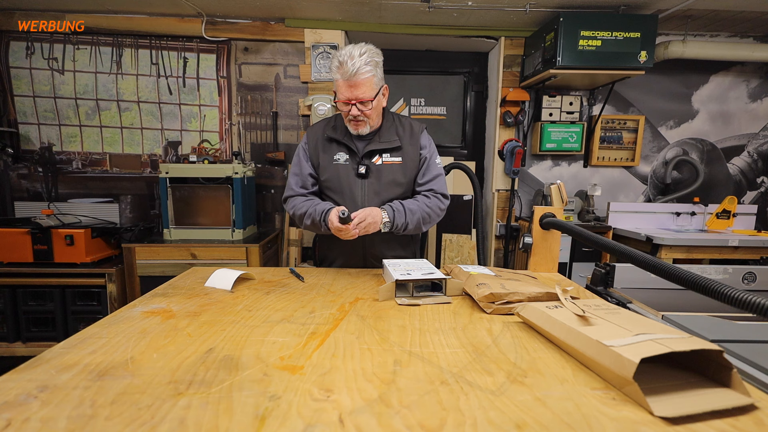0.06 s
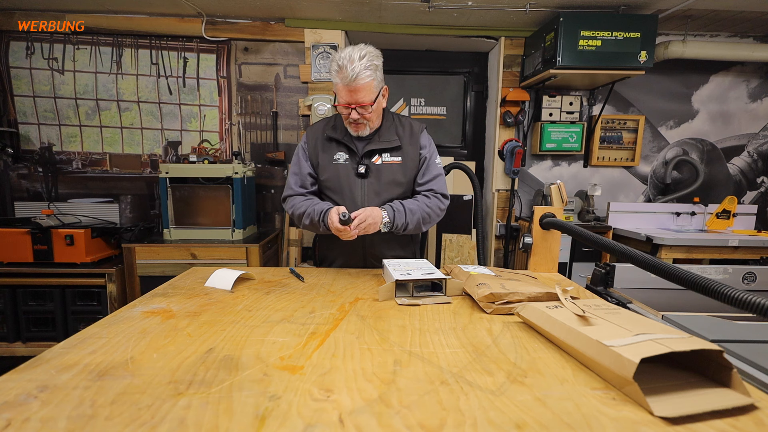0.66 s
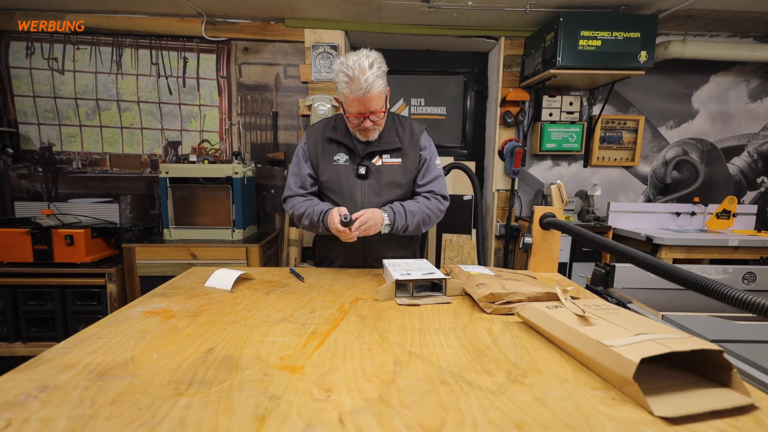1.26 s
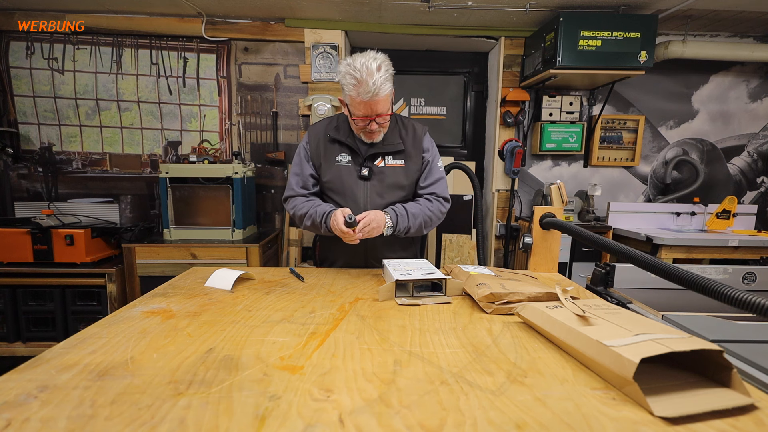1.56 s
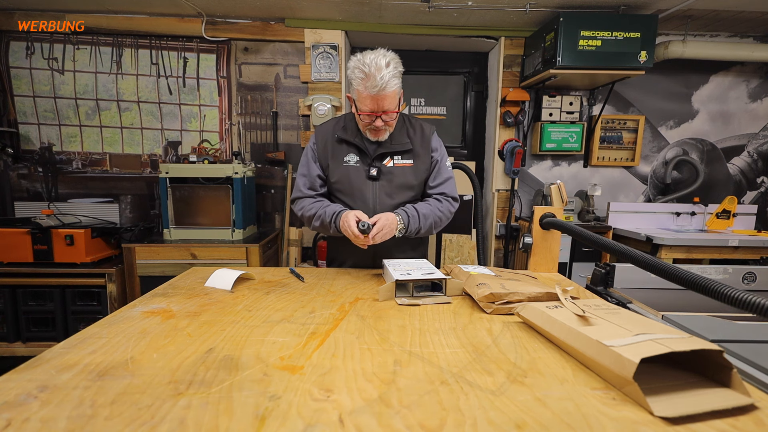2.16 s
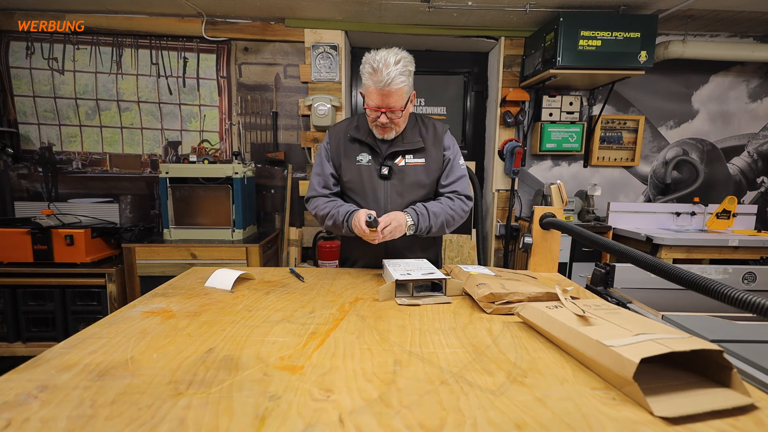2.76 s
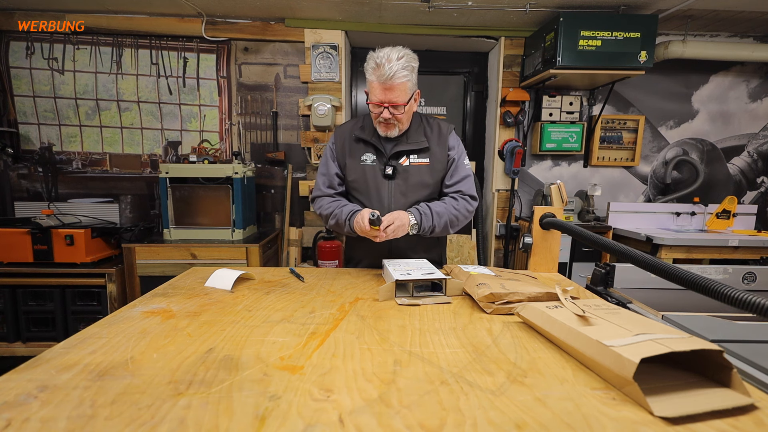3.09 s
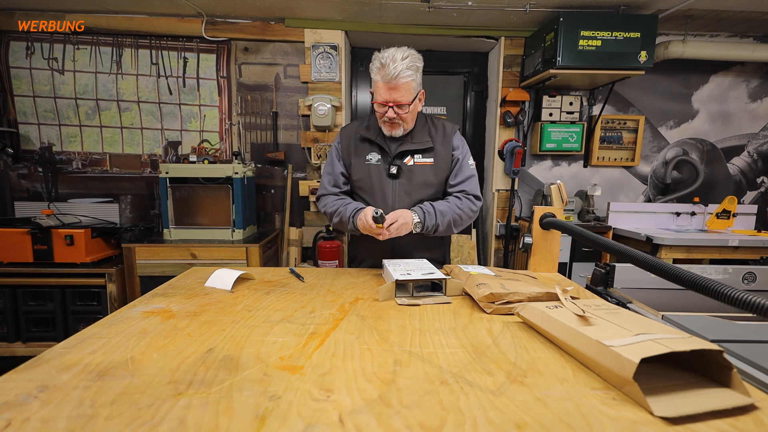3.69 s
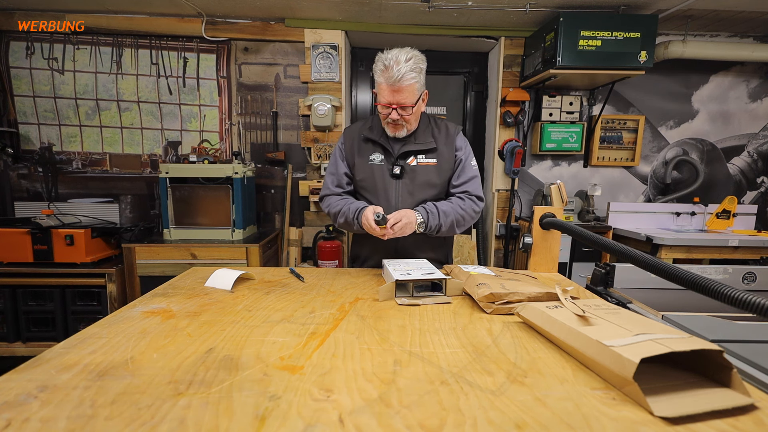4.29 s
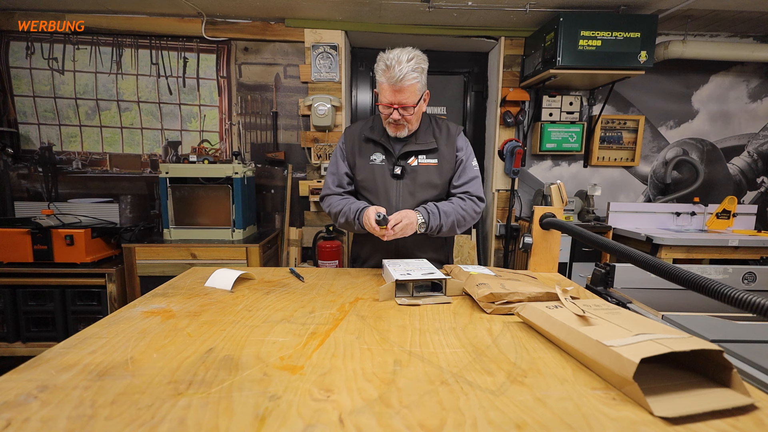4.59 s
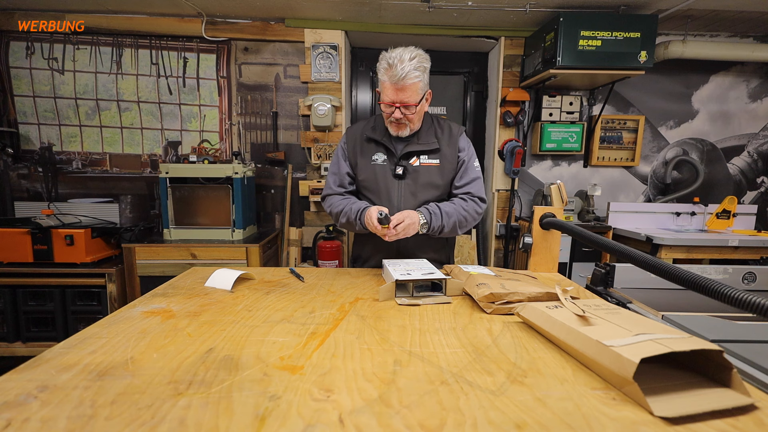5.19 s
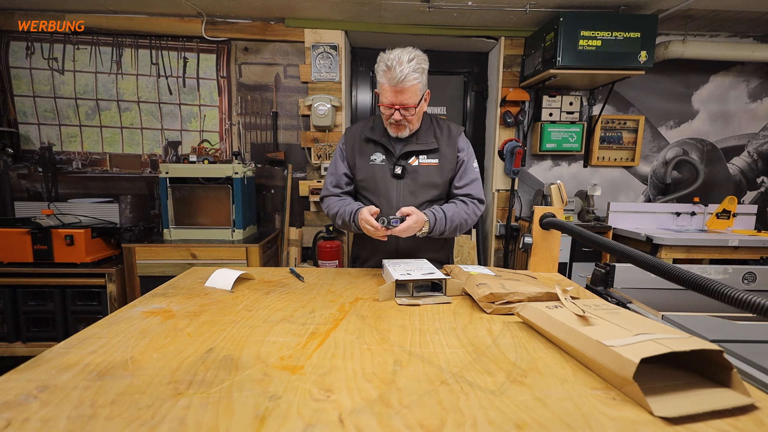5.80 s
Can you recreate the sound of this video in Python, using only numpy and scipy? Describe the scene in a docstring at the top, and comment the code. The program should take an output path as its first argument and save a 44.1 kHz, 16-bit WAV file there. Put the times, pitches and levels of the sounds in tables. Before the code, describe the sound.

A small handheld rotary tool runs free with a high, fizzing electric whine. Three sharp button clicks step it down to a quieter, rattling idle, while clothes rustle with a faint squeal. Another click brings the whine back at medium speed, the next drops it to idle, and a last one switches it off. A soft rustle and a finger scrape follow, all close to a clip-on microphone in a workshop.

```python
"""A small rotary tool runs free in a man's hands, close to a clip-on microphone in a workshop.
It opens at top speed: the three-pole motor whines, its brushes fizz and its fan rushes.
Three clipping button clicks step it down, the shaft coasting until the drive catches it each time.
At idle, brush ticks rattle the housing while clothes rustle with a faint squeal. More clicks speed it up,
drop it to idle and switch it off; a last rustle and a finger scrape end the scene."""
import sys
import numpy as np
from scipy import signal
from scipy.fft import rfft, irfft, next_fast_len
from scipy.io import wavfile
from scipy.ndimage import uniform_filter1d, minimum_filter1d, map_coordinates

SR = 44100
rng = np.random.default_rng(int(sys.argv[2]) if len(sys.argv) > 2 else 0)


def to_wav(sig):
    """Store sig (one row per channel, or 1-D mono) as 16-bit WAV at the path in sys.argv[1].

    Samples outside -1..1 are clipped; the rate is SR.
    """
    pcm = np.clip(np.atleast_2d(sig), -1, 1) * 32767
    pcm = np.round(pcm).astype(np.int16)
    wavfile.write(sys.argv[1], SR, pcm.T)  # frames by channels


N = 257974
T = np.arange(N) / SR

# The whine's voicing at each speed, in playing order: (shaft order, relative level [dB])
TOP_ORDERS = [(1, -41.5), (3, -22), (5, -43), (6, -49), (7, -36), (9, -40), (11, -28.5), (12, -19.5),
              (13, -37), (14, -34.5), (15, -32), (17, -39), (21, -39), (24, -45), (25, -40.5), (26, -39),
              (27, -40), (28, -39), (29, -43), (30, -41), (39, -41.5), (40, -42), (41, -45)]
HIGH_ORDERS = [(3, -23), (6, -31), (7, -39), (9, -24), (11, -40.5), (12, -47), (13, -33), (14, -36.5),
               (15, -22), (16, -56), (18, -35), (20, -37.5), (21, -36.5), (22, -55), (24, -33.5), (27, -56),
               (33, -39), (34, -49), (35, -47.5), (36, -43), (39, -45.5), (43, -49), (45, -46), (50, -69)]
MID_ORDERS = [(3, -49.5), (9, -27), (11, -43), (13, -38.5), (15, -42), (18, -43), (19, -47.0), (20, -44),
              (21, -30), (22, -54), (23, -40), (24, -33), (25, -47.5), (27, -34.5), (29, -44.5), (30, -41),
              (32, -54), (33, -57), (34, -54), (36, -48), (42, -48), (45, -45.5), (46, -46.8), (57, -52),
              (66, -50)]
MID_SETTLED_ORDERS = [(3, -39.5), (9, -25), (11, -50), (12, -45), (13, -36.5), (15, -31), (18, -36),
                      (19, -36), (20, -43), (21, -24.5), (22, -38), (23, -37.5), (24, -26.5), (25, -48),
                      (27, -38), (29, -44), (30, -37), (31, -44.5), (32, -50), (39, -57), (41, -38),
                      (42, -38), (43, -55), (44, -48), (45, -47), (46, -43), (54, -51), (57, -45),
                      (66, -44), (78, -45)]
REVVED_ORDERS = [(9, -29), (10, -37.5), (12, -39.5), (14, -40.5), (15, -36.5), (17, -42), (18, -40.5),
                 (20, -44), (21, -29.5), (23, -37), (24, -34), (26, -40), (27, -30), (28, -33), (30, -35.5),
                 (31, -39.5), (33, -42), (36, -40.5), (38, -45), (39, -33.5), (40, -40), (41, -54),
                 (42, -37), (43, -40), (45, -39.5), (46, -37), (60, -56), (63, -43), (66, -55), (72, -52),
                 (81, -62), (84, -52), (87, -56)]
REVVED_SETTLED_ORDERS = [(9, -29), (10, -31), (11, -34.5), (12, -48), (14, -40.5), (15, -31.5), (17, -31.5),
                         (18, -31.5), (20, -39.5), (21, -30.5), (24, -35), (26, -45), (27, -21.5),
                         (28, -40), (29, -38), (30, -30), (31, -33.5), (36, -34), (37, -35), (38, -31),
                         (39, -31.5), (40, -32), (42, -34), (43, -37), (45, -48), (50, -40), (51, -44),
                         (60, -38), (63, -54), (66, -49), (72, -40), (75, -56), (81, -52), (87, -50)]
# Tone colour of the brush bed and of its buzzy edge: (frequency [Hz], gain [dB])
BRUSH_EQ = [(700, -20.5), (1400, 10.5), (2500, -4.5), (4200, 2), (6500, -4), (7800, -2), (8600, -9),
            (9500, -3.5), (11000, -4), (13000, -9.5), (16000, -17)]
BUZZ_EQ = [(1500, -4.5), (2400, -4), (3200, 2), (4300, 1.5), (5100, -9), (6000, -3), (7200, -10),
           (8400, -19), (9400, -9.5), (12500, -15.5), (15000, -28.5)]

def whine(turns, speed, fast):
    """At speed the shaft's harmonics sing over a bed of fused brush ticks."""
    whine_db, fizz_db, _, buzz_db = spell_levels()
    # (orders, entry [s], crossfade [s], trim [dB])
    voicings = [(TOP_ORDERS, -1, .01, -.7), (HIGH_ORDERS, .47, .04, -.3),
                (MID_ORDERS, .88, .06, -.4), (MID_SETTLED_ORDERS, 1.22, .08, -.3),
                (REVVED_ORDERS, 3, .01, -.8), (REVVED_SETTLED_ORDERS, 4.11, .12, -.7)]
    harmonics = np.zeros(N)
    for orders, entry, fade, db in voicings:
        blend = fade_in(entry, fade)
        voice = amp(db) * tones(turns, orders, waver_db=1.23)
        harmonics = np.sqrt(1 - blend) * harmonics + np.sqrt(blend) * voice
    bed_ticks = brush_ticks(turns, [0, -3, -6], chatter=2.22, chatter_t60=.0093, scatter_db=0)
    brushes = coloured(bed_ticks, BRUSH_EQ)
    bed = amp(whine_db - 12.5) * band(brushes, 720, 11100)
    fizz = amp(fizz_db - 1.5) * band(brushes, 7740, 17700)
    buzz_ticks = brush_ticks(turns, [0, -5, -8], chatter=.77, chatter_t60=.0093, scatter_db=1.1)
    buzz = amp(whine_db + buzz_db) * band(coloured(buzz_ticks, BUZZ_EQ), 1520, 13500)
    sparking = speed / 200  # a faster shaft makes the brushes spark more
    grit = amp(fizz_db - 12) * sparking * band(noise(BRUSH_EQ), 6900, 16800)
    return fast * (amp(whine_db) * harmonics + bed + fizz + buzz + grit)


# The mix for each fast spell: (start [s], whine level [dB], opening dip [dB], recovery [s],
# fizz level [dB], fan level [dB], buzz relative to the whine [dB])
FAST_SPELLS = [(0, -18, -2, 0.52, -33.5, -26, -24), (.46, -17, 5, .36, -40.5, -33, -21),
               (.85, -19.5, 7, 0.48, -40.5, -38, -12.5), (3.68, -19, 4, 0.75, -34, -32, -10)]

def spell_levels():
    """Faders in dB for whine, fizz, fan and buzz: the whine jumps, then settles; the others glide."""
    glide_s, fizz_dip_share = .095, .68
    whine_db = np.full(N, FAST_SPELLS[0][1])
    others = np.array(FAST_SPELLS[0][4:])[:, None]
    for start, db, dip_db, recovery, *levels in FAST_SPELLS:
        dip = dip_db * np.clip(1 - (T - start) / recovery, 0, 1)
        whine_db = np.where(T >= start, db - dip, whine_db)
        target = np.array(levels)[:, None] - np.outer([fizz_dip_share, 0, 0], dip)
        others = others + np.clip((T - start) / glide_s, 0, 1) * (target - others)
    return whine_db, *others


# The idle hum, then the housing's song in each idle: (shaft order, relative level [dB])
HUM_ORDERS = [(6, -53), (9, -52.5), (15, -44), (17, -48), (18, -48.5), (20, -50.5), (21, -46.5), (22, -54)]
FIRST_IDLE_ORDERS = [(42, -33.5), (45, -37), (48, -43), (51, -46), (54, -42), (57, -35), (60, -40.5),
                     (61, -37), (63, -39), (64, -40.5), (66, -36.5), (78, -36.5), (79, -42), (81, -34.5),
                     (82, -34), (84, -45), (87, -42)]
SECOND_IDLE_ORDERS = [(45, -33), (46, -58), (48, -39), (51, -61), (57, -39), (60, -36), (61, -37.5),
                      (63, -65), (64, -37.5), (67, -37), (68, -50), (81, -49), (83, -39), (84, -37),
                      (85, -37.5), (87, -45)]
# The housing's resonances and the fizz on top: (frequency [Hz], gain [dB])
HOUSING_EQ = [(410, -74), (700, -20), (995, -17.5), (1120, -8), (1570, -14), (1790, -16.5), (2250, -15.5),
              (2650, -15.5), (3060, 3), (3760, -8.5), (4290, -3.5), (5150, -8), (6100, -4.5), (8230, -25),
              (9500, -24.5), (15800, -40)]
IDLE_FIZZ_EQ = [(7000, -5.5), (8000, -5), (8600, -8), (9500, 5), (10400, -7.5), (12300, -9.5),
                (13300, -5.5), (14300, -16), (16000, -15)]
# Fader rides on two treble bands, one list per idle: (time [s], ring level [dB], rattle level [dB])
IDLE_RIDES = [
    [(1.58, -29, -37), (1.67, -36.5, -37), (1.77, -35, -37), (1.95, -31, -29), (2.07, -39.5, -33.5),
     (2.62, -39, -31), (2.86, -29, -29), (3.19, -36, -30.5), (3.31, -32, -27.5), (3.64, -35.5, -29.5)],
    [(4.63, -27.5, -26.5), (4.648, -24.5, -27), (4.69, -33, -28), (4.718, -32, -27), (4.78, -33, -30),
     (5.086, -32, -29), (5.122, -29.5, -29), (5.24, -29.5, -29.5)],
]

def rattle(turns, speed, fast):
    """At low speed single ticks ring the housing; while the motor coasts the brushes only slide."""
    idle_hz, hum_db_per_octave = 71, 13
    off_drop_db, off_fade_db_per_s, stop_s = 10, 55, 5.395
    rev_s, off_s = BUTTON_CLICKS[3][0], BUTTON_CLICKS[-1][0]
    ring_db, rattle_db = curves(np.vstack(IDLE_RIDES))
    braking = np.maximum(0, -uniform_filter1d(np.gradient(np.log(speed)) * SR, size=1000))
    powered = 1 - fade_in(off_s, .005)
    drive = np.clip(.86 * powered / (1 + (braking / 5) ** 2), 0, 1)
    contacts = brush_ticks(turns, [0, -3, -5], chatter=1.7, chatter_t60=.011, scatter_db=.5)
    scratch = np.sqrt(drive) * contacts + np.sqrt(1 - drive) * rng.standard_normal(N)
    body = coloured(scratch, HOUSING_EQ)
    hum_db = -41 + hum_db_per_octave * np.log2(np.maximum(speed / idle_hz, 1))
    hum = amp(hum_db - 1.5) * np.sqrt(drive) * tones(turns, HUM_ORDERS, waver_db=2.9)
    hum += amp(hum_db - 4.5) * band(body, 620, 2430)
    # the ticks repeat so evenly at idle that the orders nearest the housing's modes sing out
    first = tones(turns, FIRST_IDLE_ORDERS, waver_db=2, spread=.75)
    second = tones(turns, SECOND_IDLE_ORDERS, waver_db=2, spread=.75)
    singing = drive ** 2 * np.minimum(idle_hz / np.maximum(speed, 1), 1) ** 2
    shell = body + singing * np.where(T < rev_s, .95 * first, 1.1 * second)
    ring = amp(ring_db - .6) * band(shell, 2504, 3660)
    clatter = amp(rattle_db - 1.16) * band(shell, 3610, 8740)
    fizz = powered * amp(rattle_db - 17) * band(coloured(scratch, IDLE_FIZZ_EQ), 7660, 16500)
    run_down = amp(-(1 - powered) * (off_drop_db + off_fade_db_per_s * (T - off_s)))
    gate = (1 - fast) * (1 - fade_in(stop_s, .06))
    return gate * (np.sqrt(run_down) * hum + run_down * (ring + clatter + fizz))


def brush_ticks(turns, pole_db, chatter, chatter_t60, scatter_db):
    """Three brush contacts a turn; each pole has its own strength and slowly changing chatter."""
    out, t = np.zeros(N), np.arange(SR // 50) / SR
    taps = np.arange(-7, 9)  # a short sinc places each tick between samples
    for pole, db in enumerate(pole_db):
        contact_turns = np.arange(1, int(turns[-1])) + pole / len(pole_db)
        at = np.interp(contact_turns, turns, np.arange(N))
        strength = amp(db + scatter_db * rng.standard_normal(len(at)))
        strength *= np.sqrt(np.minimum(np.gradient(at), SR / 50))  # even power at any tick rate
        index = at.astype(int)[:, None] + taps
        pulses = strength[:, None] * np.sinc(index - at[:, None])
        train = np.bincount(index.ravel(), pulses.ravel(), N)[:N]
        drift = 2 * np.pi * rng.random() + .5 * wobble(2.443)
        for share in (np.cos(drift), np.sin(drift)):
            burst = rng.standard_normal(len(t)) * amp(-60 * t / chatter_t60)
            out += chatter * share * signal.oaconvolve(train, burst / np.linalg.norm(burst))[:N]
        out += train
    return unit(out)


# The motor's drifting pitch, one list for the opening and one per click: (time [s], speed [turns/s])
HELD_SPEEDS = [
    [(.07, 278.5), (.17, 272), (.31, 278.2), (.44, 280.1)],
    [(.6, 209.3), (.83, 209.9)],
    [(1.02, 142.8), (1.2, 144.2), (1.3, 139.5)],
    [(1.9, 70.9), (2.32, 71.5), (2.52, 72.7), (3.15, 72.9), (3.29, 75.2), (3.64, 76.8)],
    [(3.82, 149.3), (4.17, 151), (4.5, 151.6), (4.59, 148)],
    [(4.85, 69.7), (5.25, 70.4)],
    [(5.3, 0)],
]

def shaft_speed():
    """Turns per second: after a click the shaft spins up, or drag slows it until the drive catches it."""
    drag_per_s, catch_sharpness, spin_up_s = 4.7, 12, .033
    switch_lead_s = .005  # the contact switches just ahead of the snap
    speed = curves(HELD_SPEEDS[0])[0]
    for (click_s, *_), setting in zip(BUTTON_CLICKS, HELD_SPEEDS[1:]):
        held = curves(setting)[0]
        t = np.maximum(T - click_s + switch_lead_s, 0)
        before = speed[np.argmax(t > 0)]
        if held.max() > before:
            glide = held + (before - held) * np.exp(-t / spin_up_s)
        else:
            coasting = before * np.exp(-drag_per_s * t)
            glide = (held ** catch_sharpness + coasting ** catch_sharpness) ** (1 / catch_sharpness)
        speed = np.where(t > 0, glide, speed)
    return speed


# Button hits: (time [s], level [dB], ring pitch [Hz], attack [s], thud trim [dB], bright ring trim [dB])
BUTTON_CLICKS = [(0.4547, 1, 3410, 0.00077, -65, -5.5), (0.841, .5, 3220, 0.00055, -60, -0.5),
                 (1.543, 3.4, 3400, 0.0008, -38, -28), (3.6734, 5, 3760, 0.00055, -37.5, -3),
                 (4.595, 1.5, 3480, 0.00086, -53, -12), (5.2644, 4.5, 2988, 0.0012, -60, -12)]
# Tone colour of a scrape on plastic, for button and finger: (frequency [Hz], gain [dB])
SCRAPE_EQ = [(1500, -18), (3200, -6), (6500, -11), (10000, -23), (16000, -37)]

def button():
    """The button scrapes for a moment, then snaps and rings the plastic shell."""
    clicks, press = np.zeros(N), np.zeros(N)
    t = np.arange(SR // 20) / SR
    for start, db, hz, attack, thud_db, bright_db in BUTTON_CLICKS:
        push = (t / attack * np.exp(1 - t / attack)) ** 3
        ring = np.sin(2 * np.pi * hz * t) + amp(bright_db + 2.5) * np.sin(2 * np.pi * 5950 * t)
        burst = push * rng.standard_normal(len(t))
        crack = signal.lfilter([1, 0, -1], [1, -1.25, .55], burst)  # broad peak near 4 kHz
        snap = .8 * push * ring + .21 * crack
        thud = amp(thud_db + 10.5) * np.sin(2 * np.pi * 130 * t) * amp(-60 * t / .014)
        clicks[round(start * SR):][:len(t)] += amp(db + 4.5) * (snap + thud)
        press += amp(db - 25.5) * fade_in(start - .008, .003) * (1 - fade_in(start + .0028, .0018))
    return clicks + press * noise(SCRAPE_EQ)


# Tone colour of the fan's rush: (frequency [Hz], gain [dB])
FAN_EQ = [(25, -46), (80, -36), (150, -23.5), (280, -13), (360, -9), (440, -1.5), (520, -3), (650, 4.5),
          (950, -5), (1300, -0.5), (2000, -9), (3100, -9.5), (4300, -6.5), (7000, -14.5), (15000, -43)]

def fan(fast):
    """The fan rushes at speed; at idle only a low draught is left, as soft as cloth."""
    fan_db = spell_levels()[2]
    rush = fast * amp(fan_db) * noise(FAN_EQ)
    draught = (1 - fast) * (1 - fade_in(5.3, .2)) * amp(-46) * noise(CLOTH_EQ)
    return amp(1.2 * wobble(14)) * (rush + draught)


# Swells of cloth against the microphone: (middle [s], length [s], level [dB])
CLOTH_SWELLS = [(1.35, 0.81, -44), (2.35, 0.97, -33), (4.365, 0.96, -33.5), (5.85, 0.32, -40)]
# The cloth's dull tone colour: (frequency [Hz], gain [dB])
CLOTH_EQ = [(40, -33), (90, -16), (180, -5), (350, -3), (440, 1.5), (560, -4), (1000, -6.5), (1600, -7),
            (2500, -11.5), (6000, -13), (12000, -40)]

def handling():
    """Clothes rustle with each shift of the body; a finger scrapes the shell once the tool has stopped."""
    swells = sum(amp(db) * arch(middle, length) ** 1.48 for middle, length, db in CLOTH_SWELLS)
    finger = amp(-41 + 3 * wobble(200)) * arch(middle=5.785, length=.076) * noise(SCRAPE_EQ)
    return swells * amp(1.64 * wobble(40)) * noise(CLOTH_EQ) + finger


# The squeal's thin upper partials: (harmonic number, relative level [dB])
SQUEAL_PARTIALS = [(6, 2), (7, 0), (8, 2), (9, -6), (10, -8), (12, -14)]

def squeal():
    """A faint high squeal rises and falls with the longest rustle."""
    middle_s, length_s, peak_fundamental_hz, glide_hz_per_s = 2.32, .6, 1670, 1800
    hz = peak_fundamental_hz - glide_hz_per_s * np.minimum(np.abs(T - middle_s), length_s)
    cycles = np.cumsum(hz * (1 + .006 * wobble(300) + .008 * wobble(25))) / SR
    envelope = amp(-50 + 4.5 * wobble(45)) * np.sqrt(arch(middle_s, length_s))
    return envelope * tones(cycles, SQUEAL_PARTIALS, waver_db=4)


# The workshop's noise floor: (frequency [Hz], gain [dB])
ROOM_EQ = [(15, -33), (25, -15), (43, -8), (96, -10), (133, -2.5), (179, -3), (403, -6.5), (557, -9.5),
           (710, -4.5), (929, -13), (1250, -11), (12700, -17), (15800, -20)]

def workshop(x, t60):
    """The cluttered room answers x briefly, over a steady room tone."""
    t = np.arange(SR // 3) / SR
    tail = rng.standard_normal(len(t)) * amp(-60 * t / t60) * (t > .004)
    echo = signal.fftconvolve(x, tail / np.linalg.norm(tail))[:N]
    return amp(-21) * echo + amp(-51.5) * noise(ROOM_EQ)


def tones(turns, orders, waver_db, spread=1):
    """Harmonics of a rotation, each wavering alone, at rms 1; a small phase spread bunches them."""
    knots = np.arange(0, N / SR + 1, .1)
    out = np.zeros(N)
    for order, db in orders:
        waver = np.interp(T, knots, amp(waver_db * rng.standard_normal(len(knots))))
        out += amp(db) * waver * np.sin(2 * np.pi * (order * turns + spread * rng.random()))
    return unit(out)


def coloured(x, eq):
    """x through a minimum-phase filter shaped like the EQ curve, at rms 1."""
    size = 2 * next_fast_len(N // 2 + SR // 4)
    hz, db = np.transpose(eq)
    gain = amp(np.interp(np.log(np.fft.rfftfreq(size, 1 / SR) + 1), np.log(hz), db))
    cepstrum = irfft(np.log(gain + 1e-6))[:size // 2]
    cepstrum[1:] *= 2
    return unit(irfft(rfft(x, size) * np.exp(rfft(cepstrum, size)))[:N])


def noise(eq):
    """Noise shaped by an EQ curve, at rms 1."""
    return coloured(rng.standard_normal(N), eq)


def band(x, lo_hz, hi_hz):
    """One band of x, at rms 1."""
    return unit(signal.sosfilt(signal.butter(4, [lo_hz, hi_hz], "band", fs=SR, output="sos"), x))


def curves(rows):
    """One automation curve for each column after the time."""
    times, *columns = np.transpose(rows)
    return [np.interp(T, times, column) for column in columns]


def wobble(rate):
    """A smooth random curve, rate knots a second."""
    return map_coordinates(rng.standard_normal(int(N * rate / SR) + 4), [T * rate])


def fade_in(middle, length):
    """A straight ramp from 0 to 1."""
    return np.clip((T - middle) / length + .5, 0, 1)


def arch(middle, length):
    """A smooth rise and fall of height 1."""
    return np.cos(np.pi * np.clip((T - middle) / length, -.5, .5))


def amp(db):
    return 10 ** (np.asarray(db) / 20)


def unit(x):
    return x / np.sqrt(np.mean(x ** 2) + 1e-20)


def scene():
    """The tool and the clothes, close to one microphone."""
    speed = shaft_speed()
    turns = np.cumsum(speed * (1 + .00042 * wobble(45))) / SR
    # crossfader: 1 plays the whine, 0 the idle rattle
    fast = 1 - fade_in(1.548, .0049) + fade_in(3.7, .042) - fade_in(4.602, .0037)
    direct = whine(turns, speed, fast) + rattle(turns, speed, fast) + button() + squeal()
    mono = direct + workshop(direct, t60=.25) + fan(fast) + handling()
    return np.array([mono, mono])


def record(dry):
    """A fast limiter holds the clicks, which still clip a little; a steep low-pass trims the top."""
    ceiling, window_s, top_hz = 1.4, .0005, 16000
    window = round(window_s * SR)
    needed_gain = ceiling / np.maximum(np.abs(dry), ceiling)
    gain = uniform_filter1d(minimum_filter1d(needed_gain, window), window)
    clipped = np.clip(dry * gain, -1, 1)
    size = next_fast_len(N + SR // 4)
    passband = np.fft.rfftfreq(size, 1 / SR) < top_hz
    return irfft(rfft(clipped, size) * passband, size)[:, :N]


dry = scene()
out = record(dry)
to_wav(out)
```